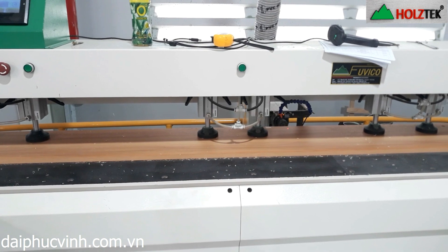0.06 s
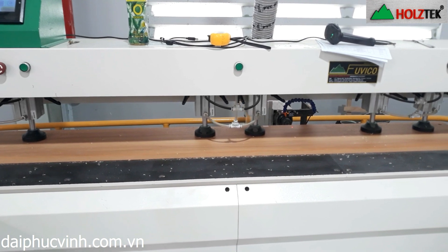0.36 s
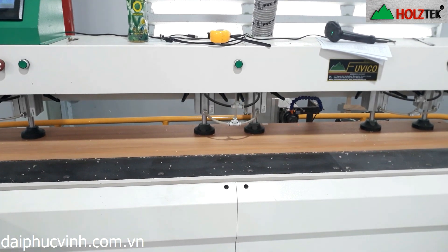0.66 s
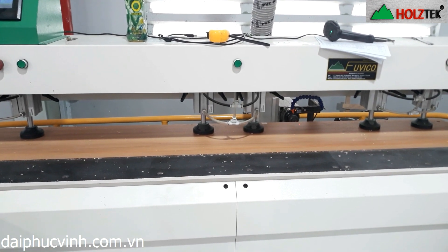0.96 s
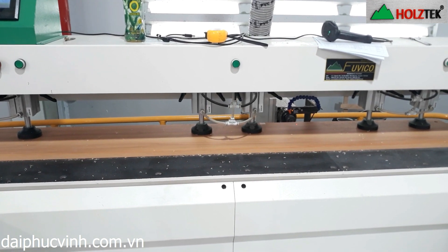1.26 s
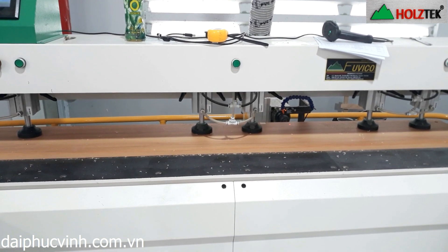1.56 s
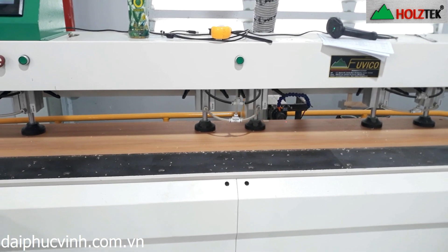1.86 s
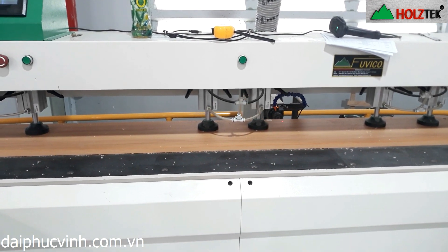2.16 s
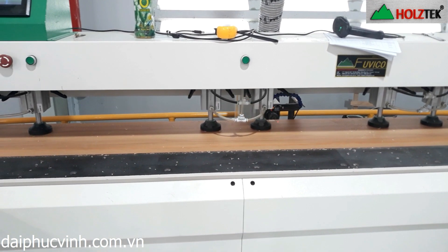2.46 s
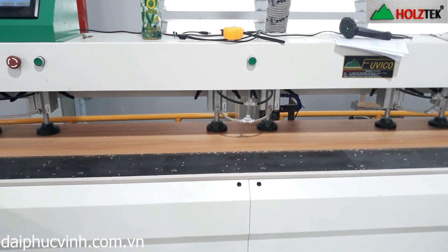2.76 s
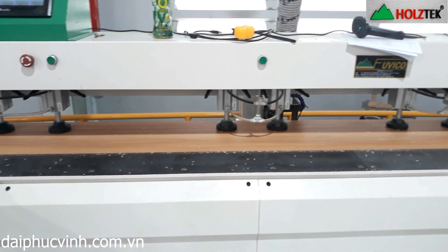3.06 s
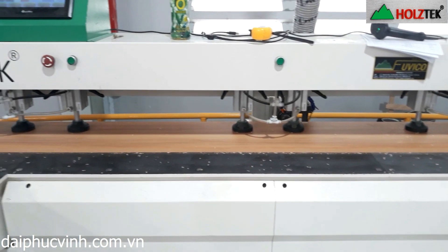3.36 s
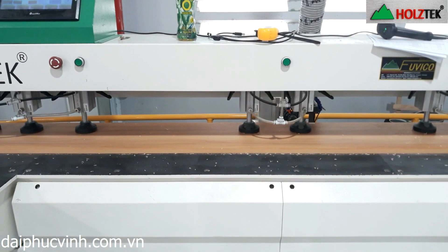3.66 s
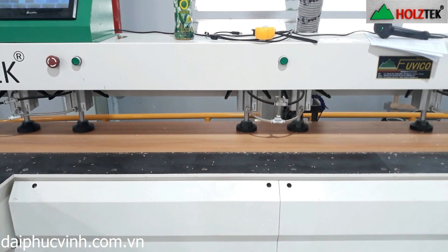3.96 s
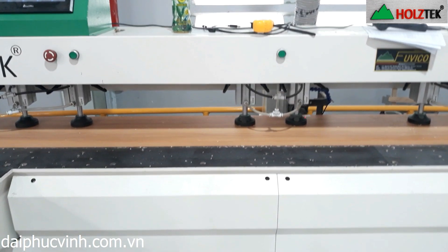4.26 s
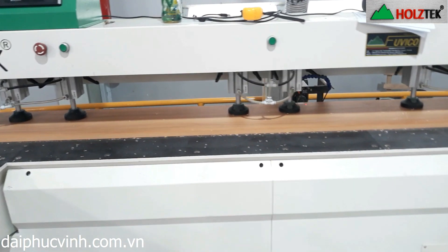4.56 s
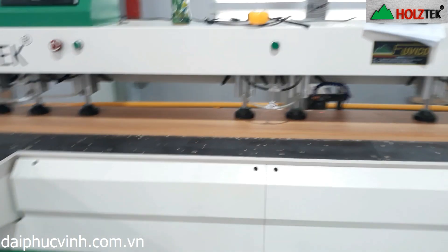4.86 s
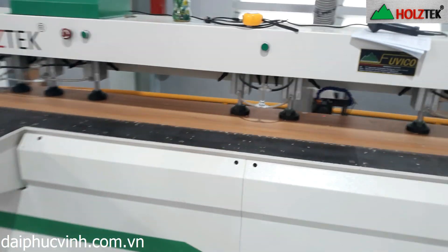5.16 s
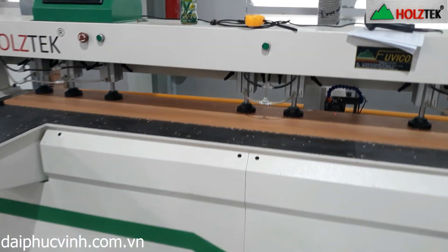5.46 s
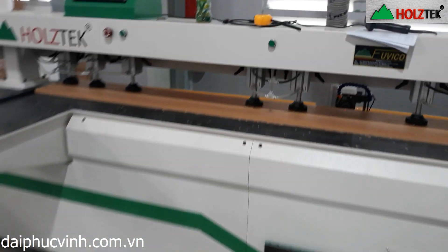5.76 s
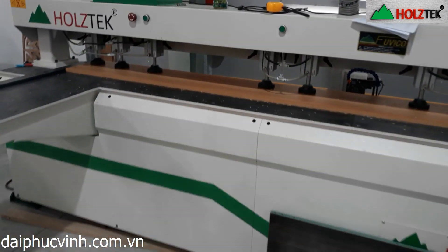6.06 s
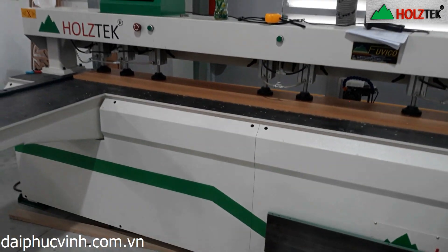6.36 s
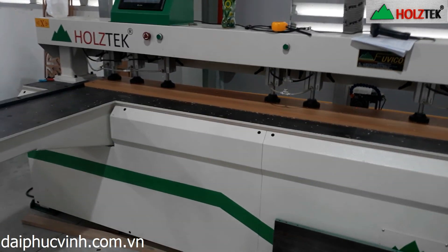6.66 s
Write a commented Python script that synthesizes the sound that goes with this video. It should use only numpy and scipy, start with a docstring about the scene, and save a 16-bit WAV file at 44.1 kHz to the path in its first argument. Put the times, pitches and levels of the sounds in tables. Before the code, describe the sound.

Continuous hissing air, a spindle's hum and wavering whines come from a wood drilling machine, with fans droning behind.

```python
"""A bright rush of air over a steady hum: a woodworking CNC drilling machine running in a showroom,
heard from a phone microphone carried slowly along its front. The air rushes round the tool and rings
the gaps of the head; the spindle hums and whines on multiples of its turning rate. Pumps and fans
drone behind. Tones and resonances swell, fade and shift as the head and the listener move."""
import sys
import numpy as np
from scipy import signal
from scipy.fft import rfft, irfft
from scipy.io import wavfile
from scipy.ndimage import map_coordinates

SR = 44100
rng = np.random.default_rng(int(sys.argv[2]) if len(sys.argv) > 2 else 0)


def dump(signal):
    """Clip the signal to [-1, 1] and save it as 16-bit WAV at the path in sys.argv[1]."""
    limited = np.clip(np.atleast_2d(signal).T, -1, 1)
    pcm = np.round(limited * 32767).astype(np.int16)
    wavfile.write(sys.argv[1], SR, pcm)


N = 295470
TIME = np.arange(N) / SR
BIN_HZ = np.maximum(np.fft.rfftfreq(N, 1 / SR), 1)

# The air at the head, as it reaches the microphone.
# Each row: time in seconds, rush level in dB, change of its treble in dB, spray level in dB.
AIR_LEVELS = [(0, -16.5, 1, -29.5), (1.8, -15.5, 0, -31), (2.6, -17.5, -.5, -31.6), (3.3, -16.5, -1, -28.1),
              (4.2, -16.5, -0.5, -28.4), (4.7, -17.9, -.8, -29.2), (5.8, -17.3, -.3, -28.5),
              (6.2, -17.4, -.8, -29.4), (6.7, -15.2, -3, -28.3)]
# The rush and the fine spray above it. Each row: frequency in Hz, relative level in dB.
RUSH_SPECTRUM = [(1100, -37), (1500, -11), (1750, -6.5), (1950, -8), (2150, -6), (2500, -7), (2750, -4.5),
                 (3600, -1), (4000, -0.5), (6200, -4.5), (7400, -9.5), (8200, -15), (9600, -23),
                 (12500, -21.5)]
SPRAY_SPECTRUM = [(8000, -34), (9600, -13), (10500, -5.5), (11500, -2.5), (12800, 2.5), (13600, 2.5),
                  (14500, 2), (15400, -2), (16000, -1)]


def rushing_air():
    """Turbulent air rushes round the tool, rings the gaps of the head and thins to a fine spray."""
    rush_db, treble_db, spray_db = curves(AIR_LEVELS)
    rush = noise(colour(RUSH_SPECTRUM))
    # the treble beams, so it comes and goes with the microphone's place
    treble = irfft(rfft(rush) / (1 + (6000 / BIN_HZ) ** 8), N)
    rush = undb(rush_db) * (rush + (undb(treble_db) - 1) * treble)
    gaps = sum(gap_resonance(gap) for gap in HEAD_GAPS)
    churn = undb(.31 * walk(32))
    spray = undb(spray_db + .3 * walk(14)) * noise(colour(SPRAY_SPECTRUM))
    return churn * (rush + gaps) + spray


# The gaps round the tool, heard from in front of the head and from one side. Each named row: width in
# Hz, centre in front in Hz, centre aside in Hz, level in front in dB, level aside in dB.
HEAD_GAPS = {"low": (420, 3070, 2730, -25, -30), "main": (660, 4480, 4450, -20.5, -27.5),
             "upper": (390, 5280, 5900, -22.2, -26), "top": (380, 6500, 6630, -32, -28.5),
             "side": (400, 4950, 5000, -36, -24), "sizzle": (500, 12900, 13700, -49, -46)}
# A gap whistles louder or softer for a while.
# Each row: gap name, start in seconds, length in seconds, level change in dB, pitch bend in Hz.
GAP_SWELLS = [("low", 0.71, .7, 3.2, -40), ("low", 4.4, .95, -3.5, -250), ("low", 5.4, .3, 3.8, 20),
              ("main", 1.0, .3, 2, 100), ("main", 1.73, .7, 5.6, 10), ("main", 2.43, 2.42, 4.3, -40),
              ("main", 4.85, .25, 2, -250), ("main", 5.08, .27, -7, 0), ("main", 5.35, .3, 4, 160),
              ("main", 5.65, .45, -5, 0), ("upper", 1.72, .35, 3.7, 120), ("upper", 4.55, .8, -1.5, 40),
              ("top", 0.92, 1.25, 5.3, 70), ("top", 4.5, 1.35, 3.5, -220), ("side", 5.92, .58, 5.8, 0),
              ("sizzle", 5.0, .17, 14, 800), ("sizzle", 5.8, .3, 16, -100)]


def gap_resonance(gap):
    """Turbulence rings one gap; its band swells, bends and shifts as the listener steps aside."""
    width_hz, front_hz, aside_hz, front_db, aside_db = HEAD_GAPS[gap]
    aside = ease(start_s=5.0, length_s=1.3)
    rows = [row for name, *row in GAP_SWELLS if name == gap]
    bend_hz = swells([(start, length, bend) for start, length, _, bend in rows], edge_s=.33)
    swell_db = swells([(start, length, change) for start, length, change, _ in rows], edge_s=.33)
    centre_hz = front_hz + aside * (aside_hz - front_hz) + bend_hz
    level_db = front_db + aside * (aside_db - front_db) + swell_db
    # steep-sided low noise, shifted up to the moving centre
    phase = 2 * np.pi * np.cumsum(centre_hz) / SR
    skirt = 1 / np.sqrt(1 + (2 * BIN_HZ / width_hz) ** 6)
    return undb(level_db) * (noise(skirt) * np.cos(phase) + noise(skirt) * np.sin(phase))


# The spindle's hum at the microphone. Each row: time in seconds, level in dB.
HUM_LEVELS = [(0, -23.2), (1.8, -23.5), (3.1, -27.5), (4.8, -25.5), (5.55, -26), (5.75, -30.5),
              (6.7, -28.5)]
# Its whines between swells. Each row: multiple of the turning rate, level in dB.
TOOL_WHINES = [(2, -42.8), (4, -44), (6, -43), (8, -43), (10, -40.5), (22, -61)]
# A whine comes forward. Each row: multiple, start in seconds, length in seconds, rise in dB.
WHINE_SWELLS = [(4, -.1, 1.01, 11), (4, 1.05, .68, 6.5), (4, 1.8, .6, 12), (4, 2.45, .6, 8.5),
                (4, 4.5, 0.52, 7.5), (4, 5.42, .45, 4), (6, .87, 0.27, 7.5), (6, 2.22, .35, 13),
                (6, 2.57, .43, 9), (6, 3.55, .7, 5), (10, .7, .22, 15), (10, .92, .95, 9),
                (10, 2.9, .25, 9), (10, 5.45, .27, 10)]


def spindle():
    """Imbalance hums once a turn; the two-edged tool whines on even multiples, high ones more restless."""
    phase = shaft_phase(hz=299.7, wander=.00023)
    out = undb(*curves(HUM_LEVELS)) * tone(phase, flutter=.022, flutter_hz=20)
    for multiple, rest_db in TOOL_WHINES:
        multiple = round(multiple)
        rows = [row for which, *row in WHINE_SWELLS if round(which) == multiple]
        fading_db = walk(3.2)
        level_db = rest_db + fading_db + swells(rows, edge_s=.17)
        out += undb(level_db) * tone(multiple * phase, flutter=.065 * multiple, flutter_hz=4.7 * multiple)
    return out


# The blower's whine swells or fades. Each row: start in seconds, length in seconds, change in dB.
BLOWER_SWELLS = [(1.15, .35, 11), (1.55, .85, 6), (2.55, 1.0, -5), (3.75, 0.71, 4), (4.95, 0.68, 9.5),
                 (5.65, .53, 13)]
# Pumps, fans and drives, farther back. Each row: frequency in Hz, level in dB.
MOTOR_DRONES = [(40.2, -68), (81, -56), (117.5, -55.5), (209, -49.5), (250, -43.5), (485.1, -45.5),
                (571.9, -44.5), (775, -52), (970.1, -50), (4370.7, -38)]
# The fans' roar at the microphone. Each row: time in seconds, level in dB.
ROAR_LEVELS = [(0, -28.8), (1.4, -28.6), (4.2, -30.8), (6.7, -28.8)]
# The colour of that roar. Each row: frequency in Hz, relative level in dB.
ROAR_SPECTRUM = [(25, -34.3), (45, -20.5), (70, -16.5), (110, -6), (150, -0.4), (210, -0.5), (330, -4.5),
                 (480, -6), (730, -8.5), (900, -3.5), (1100, -7.0), (1350, -7.5), (1800, -13.5)]


def pumps_and_fans():
    """Behind the head, a blower whines and motors drone over the broad roar of the fans."""
    blower_db = -46 + swells(BLOWER_SWELLS, edge_s=.17)
    out = undb(blower_db) * tone(shaft_phase(hz=798.4, wander=.00037), flutter=.12, flutter_hz=7.8)
    for hz, db in MOTOR_DRONES:
        out += undb(db) * tone(shaft_phase(hz, wander=.0002), flutter=.39, flutter_hz=2.3)
    return out + undb(*curves(ROAR_LEVELS)) * noise(colour(ROAR_SPECTRUM))


# Board, clamps and housing, close to the tool. Each row: echo delay in milliseconds, level in dB.
PANEL_ECHOES = [(.94, -37), (1.09, -33), (1.33, -31), (1.67, -37), (2.29, -33), (3.33, -28)]


def panel_echoes(x, sway_ms):
    """Short echoes comb the hiss; their paths change a little with the motion."""
    out = x.copy()
    for lag_ms, db in PANEL_ECHOES:
        delay_s = (lag_ms + sway_ms * walk(.6)) / 1000
        out += undb(db) * map_coordinates(x, [(TIME - delay_s) * SR], order=3)
    return out


def showroom_echoes(x, echo_db, count=14):
    """Later echoes off floor and walls add a fine, slowly shifting ring."""
    out = x.copy()
    for lag_s in rng.uniform(.004, .045, count):
        delay_s = lag_s + .00004 * walk(.5)
        out += undb(echo_db) * map_coordinates(x, [(TIME - delay_s) * SR], order=3)
    return out / np.sqrt(1 + count * undb(echo_db) ** 2)


def shaft_phase(hz, wander):
    """Phase of a shaft whose speed wanders slightly."""
    turning_hz = hz * (1 + wander * walk(3.0))
    return 2 * np.pi * np.cumsum(turning_hz) / SR + rng.uniform(0, 2 * np.pi)


def tone(phase, flutter, flutter_hz):
    """A tone whose strength and phase flutter in the moving air."""
    strength = 1 + flutter * walk(flutter_hz)
    jitter = flutter * walk(flutter_hz)
    return np.sqrt(2) * (strength * np.sin(phase) + jitter * np.cos(phase))


def noise(gain):
    """Noise of rms 1, shaped by a gain at each frequency."""
    shaped = irfft(rfft(rng.standard_normal(N)) * gain, N)
    return shaped / np.sqrt(np.mean(shaped ** 2))


def walk(rate_hz):
    """Smooth random drift of rms 1 that changes about rate_hz times a second."""
    return noise(1 / (1 + (BIN_HZ / rate_hz) ** 4))


def colour(points):
    """Gain at each frequency from (Hz, dB) points."""
    hz, db = np.transpose(points)
    return undb(np.interp(np.log(BIN_HZ), np.log(hz), db, left=-120, right=-120))


def curves(table):
    """The columns after a table's times, each as one value a sample."""
    times, *columns = np.transpose(table)
    return [np.interp(TIME, times, column) for column in columns]


def swells(rows, edge_s):
    """Sum of changes (start s, length s, size) that each ease in, hold and ease out."""
    return sum(size * (ease(start - edge_s / 2, edge_s) - ease(start + length - edge_s / 2, edge_s))
               for start, length, size in rows)


def ease(start_s, length_s):
    """A smooth move from 0 to 1."""
    return np.sin(np.pi / 2 * np.clip((TIME - start_s) / length_s, 0, 1)) ** 2


def undb(db):
    """Decibels to gain."""
    return 10 ** (np.asarray(db) / 20)


def scene():
    """The machine straight ahead of the microphone, alike in both channels."""
    near_hiss = panel_echoes(rushing_air(), sway_ms=.012)
    room_hiss = showroom_echoes(near_hiss, echo_db=-22)
    sound = room_hiss + spindle() + pumps_and_fans()
    return np.array([sound, sound])


def record(dry):
    """A soft limiter rounds the highest peaks to prevent clicks; the top treble is cut."""
    rounded = dry / (1 + (dry / .94) ** 10) ** .1
    lowpass = signal.ellip(12, .1, 90, 15720, fs=SR, output="sos")
    return signal.sosfilt(lowpass, rounded)


dry = scene()
out = record(dry)
dump(out)
```